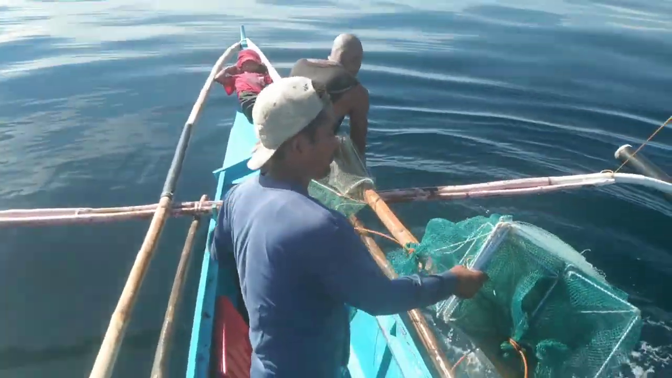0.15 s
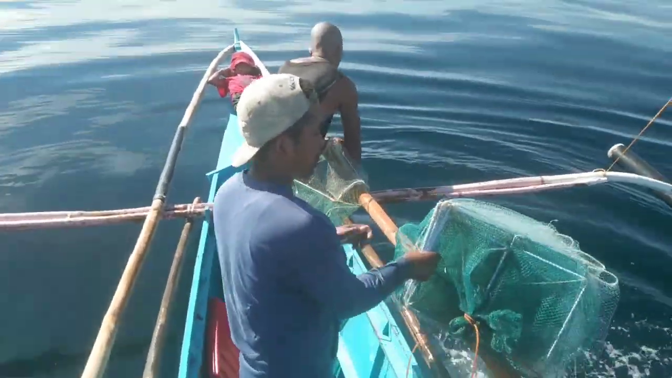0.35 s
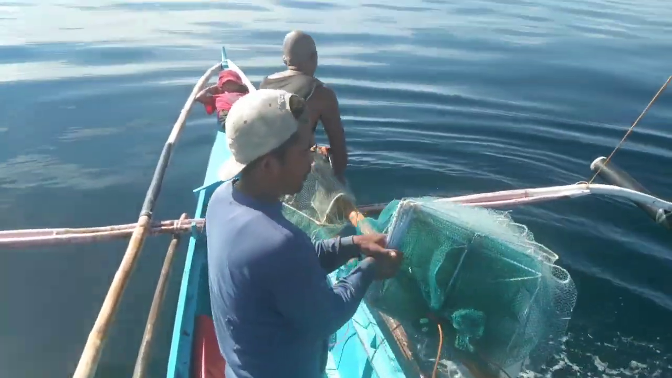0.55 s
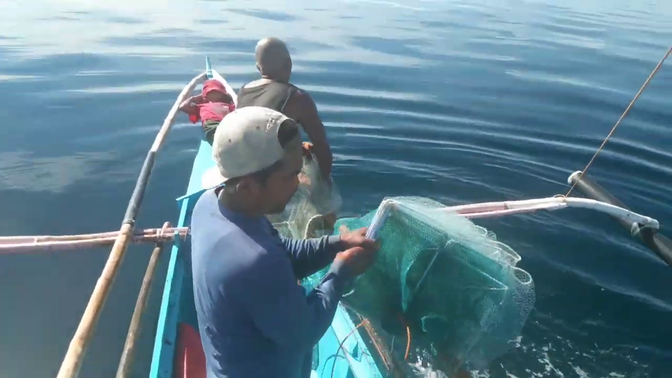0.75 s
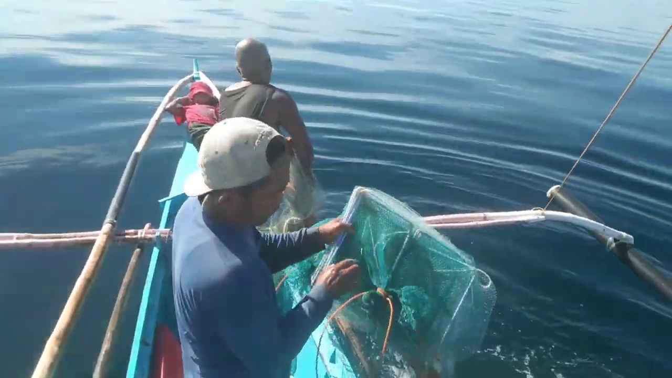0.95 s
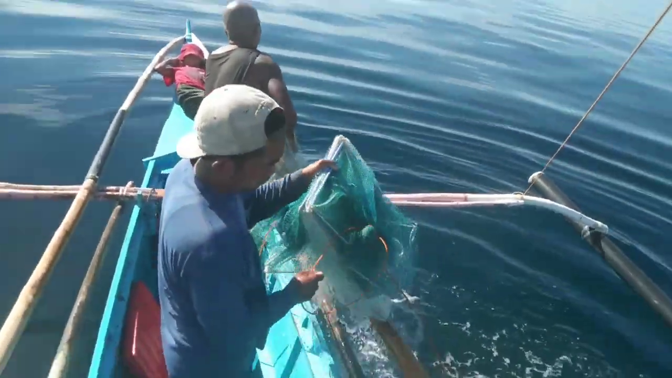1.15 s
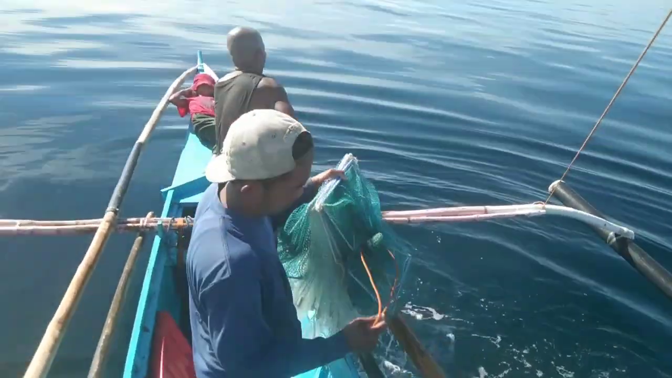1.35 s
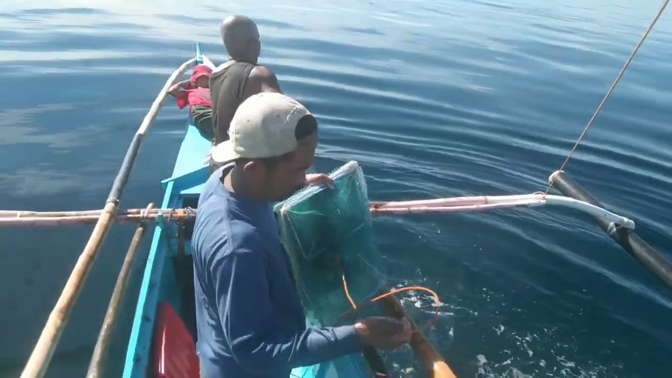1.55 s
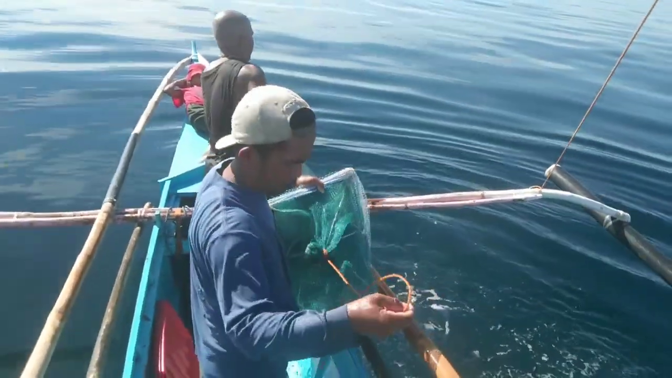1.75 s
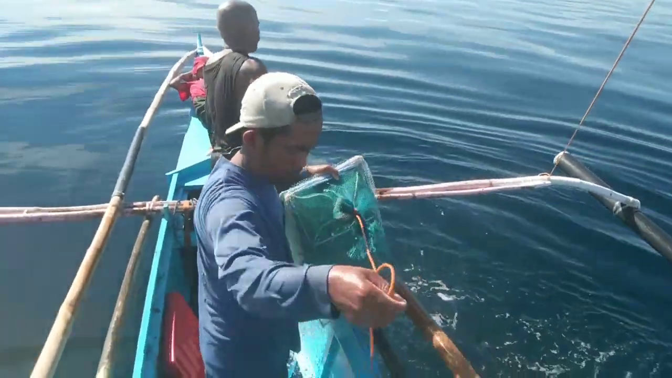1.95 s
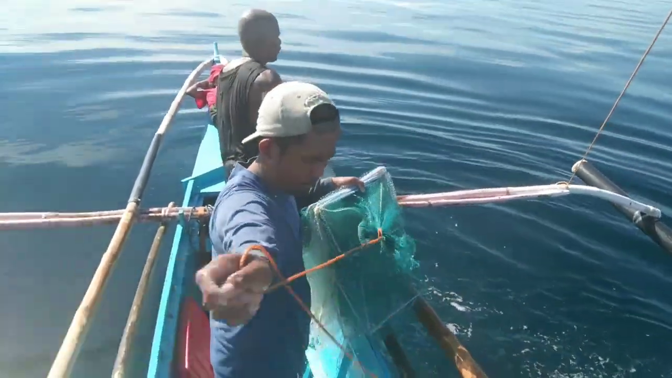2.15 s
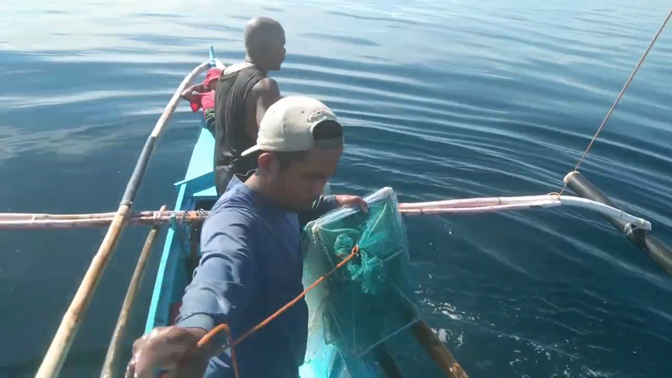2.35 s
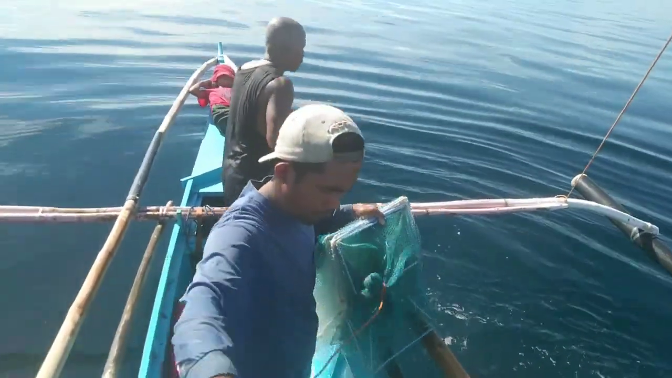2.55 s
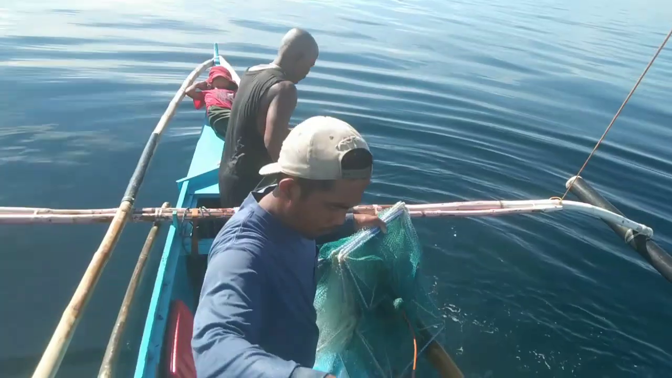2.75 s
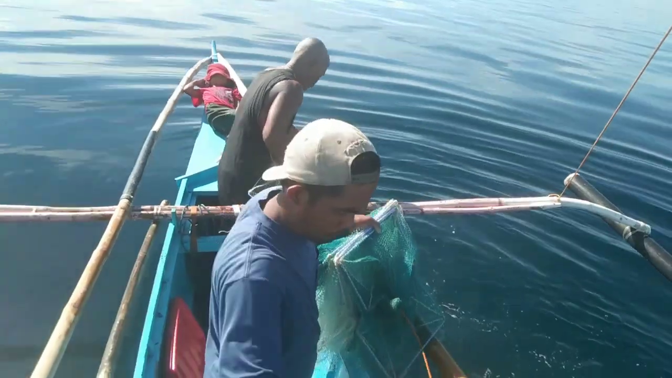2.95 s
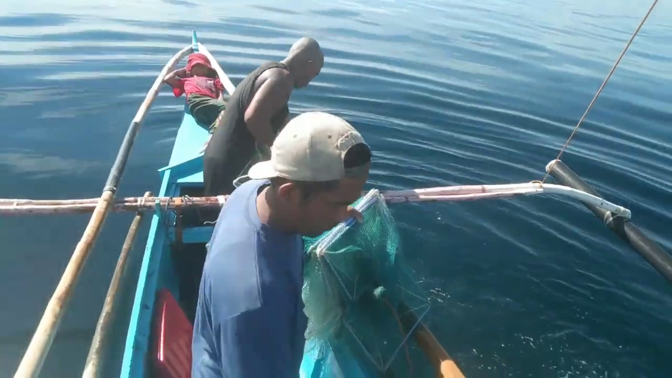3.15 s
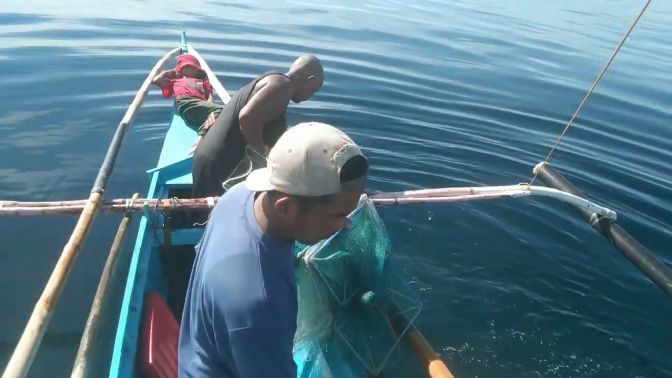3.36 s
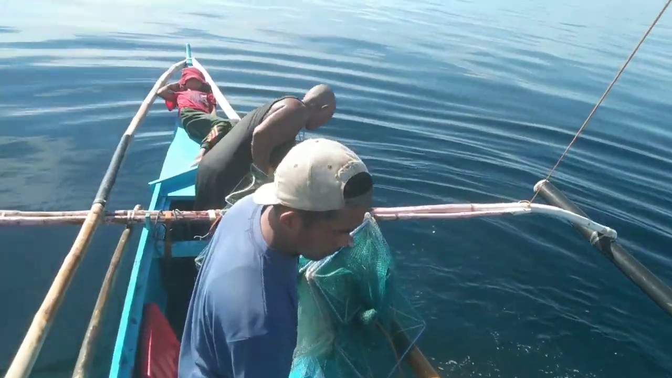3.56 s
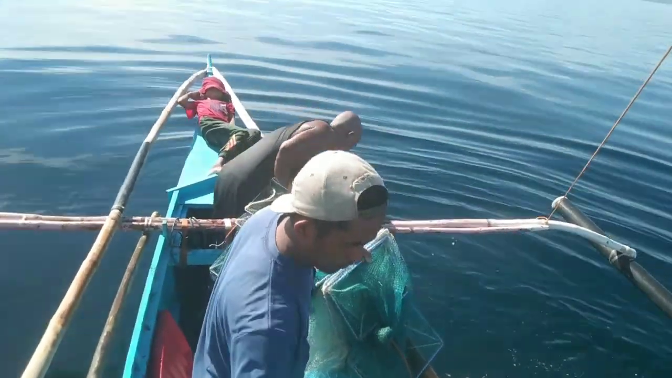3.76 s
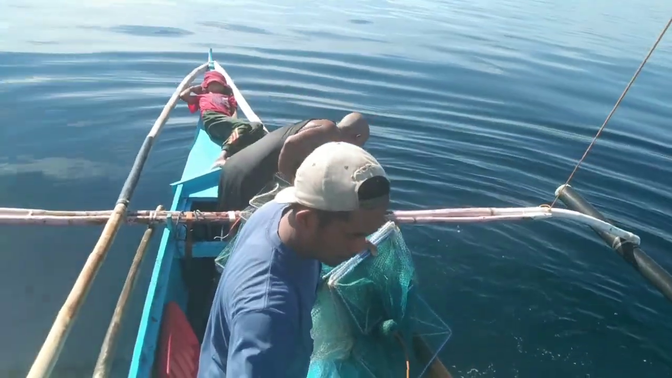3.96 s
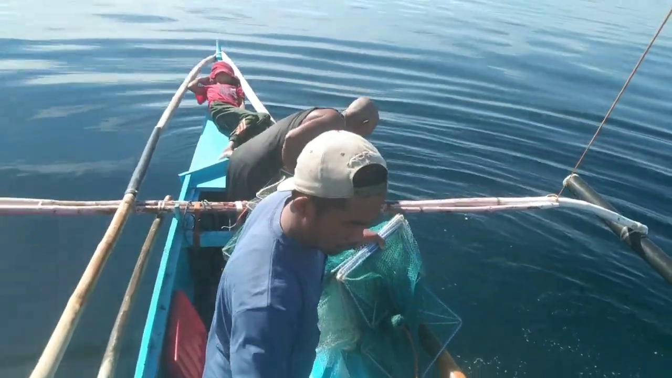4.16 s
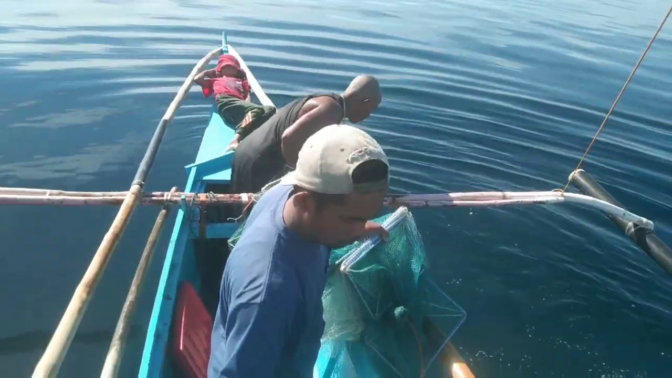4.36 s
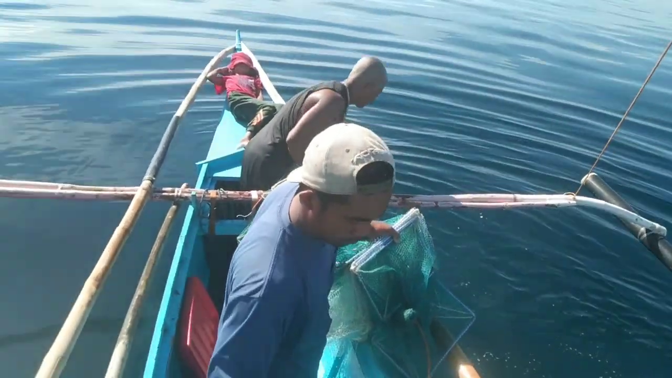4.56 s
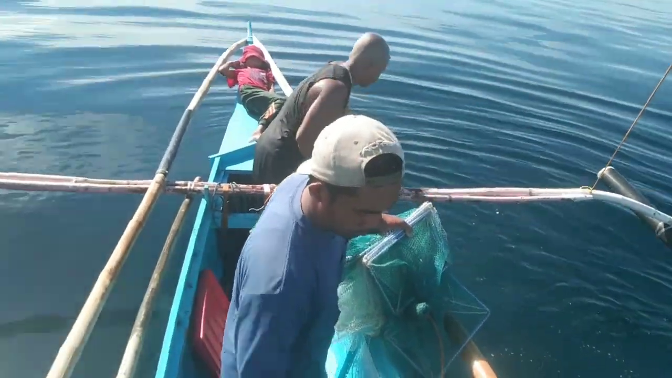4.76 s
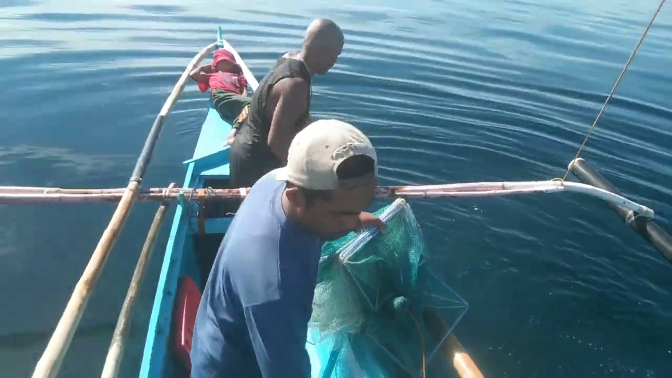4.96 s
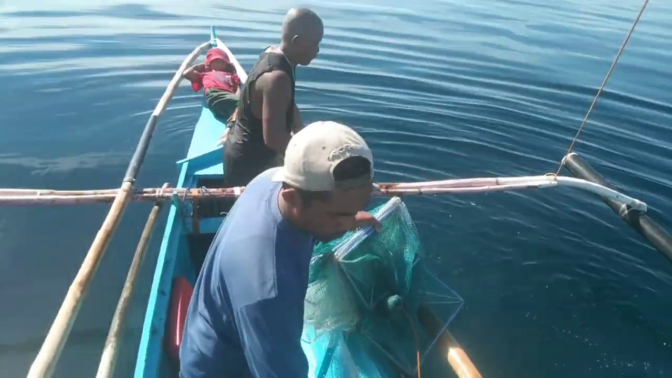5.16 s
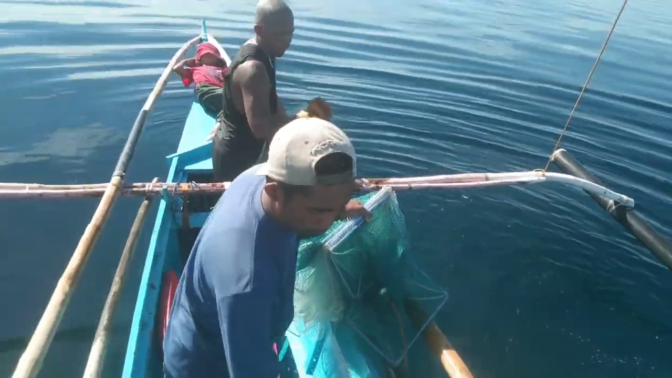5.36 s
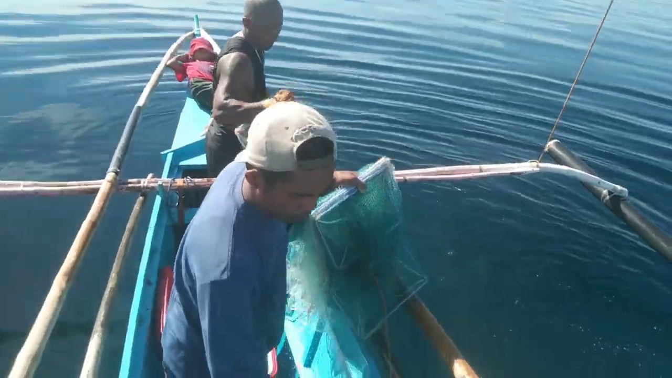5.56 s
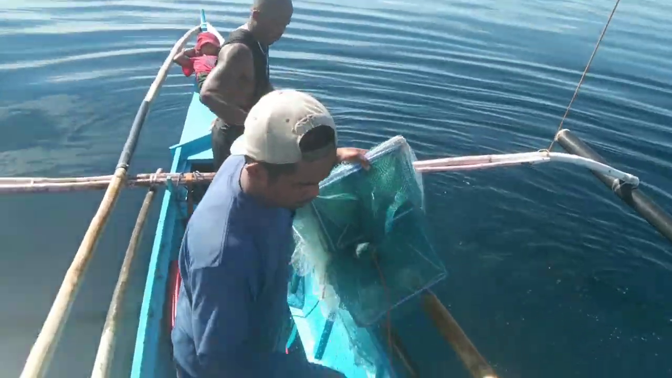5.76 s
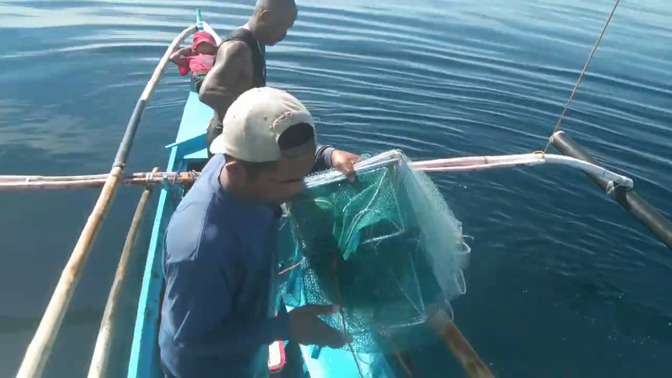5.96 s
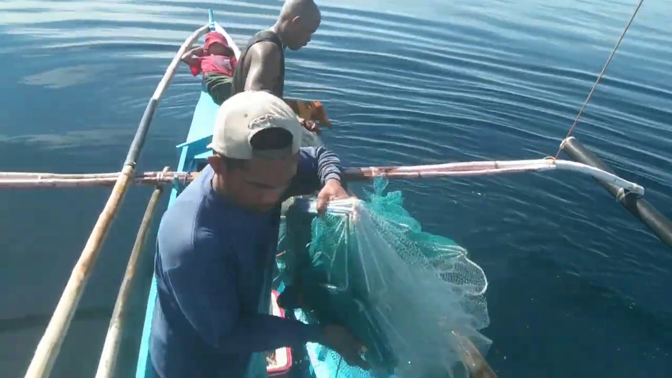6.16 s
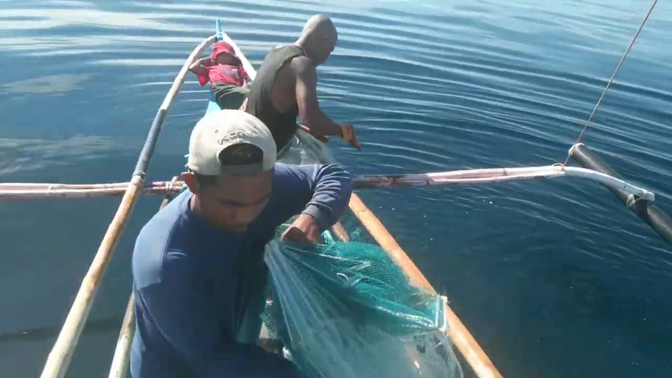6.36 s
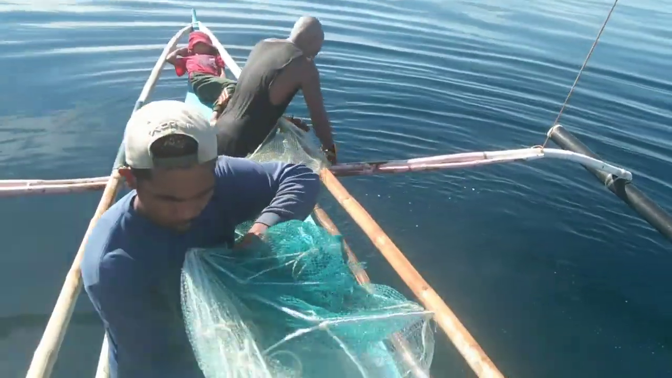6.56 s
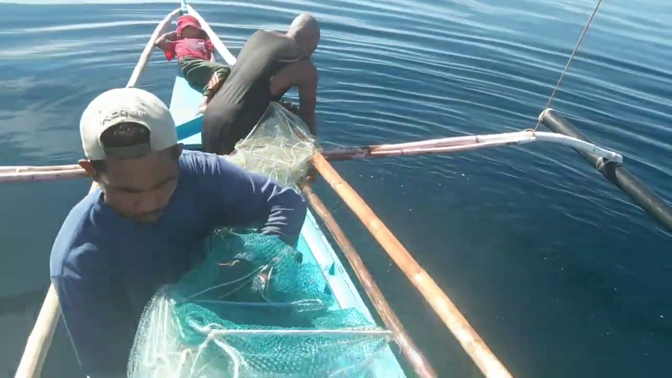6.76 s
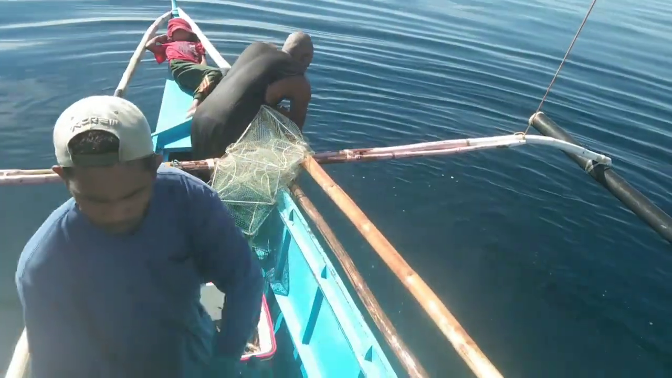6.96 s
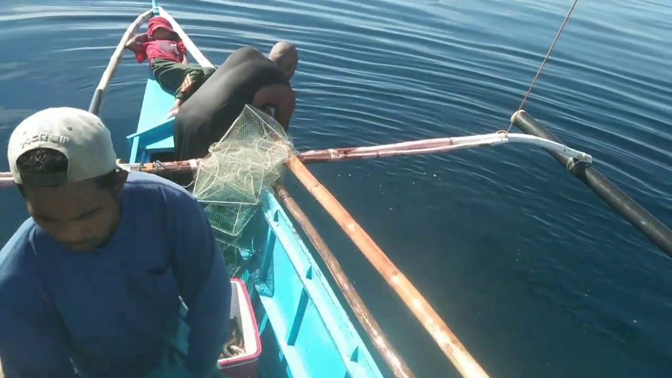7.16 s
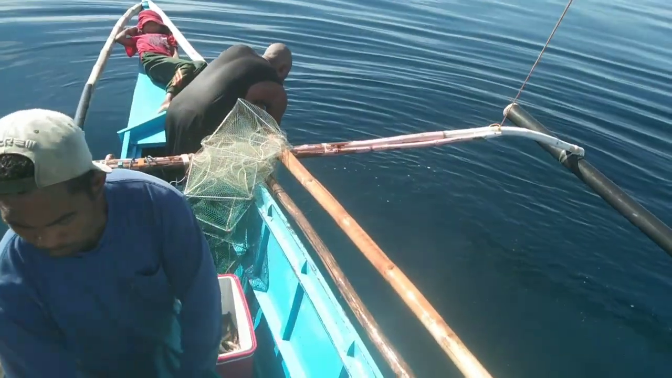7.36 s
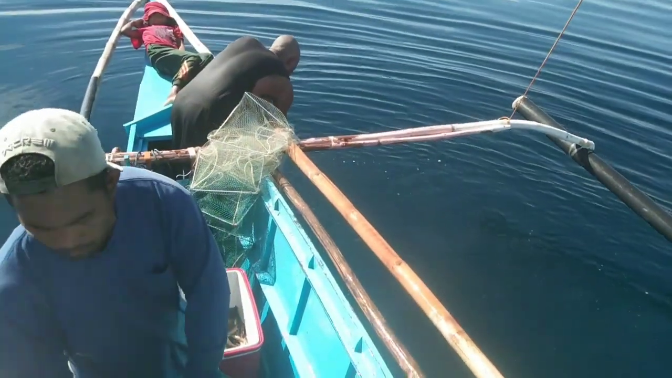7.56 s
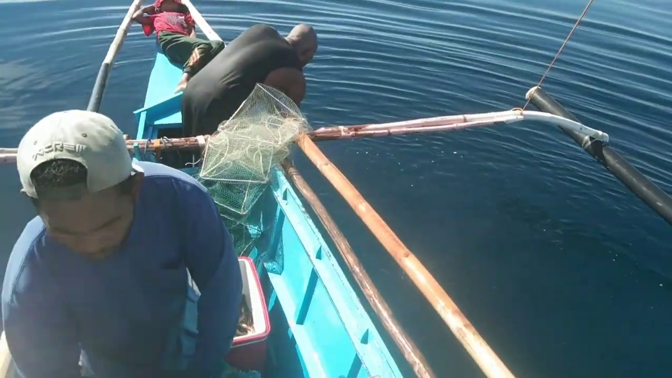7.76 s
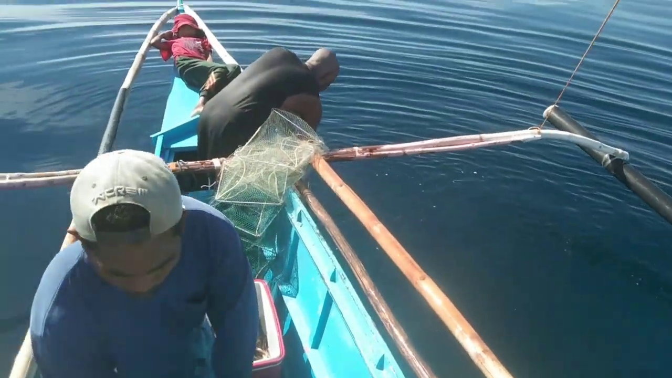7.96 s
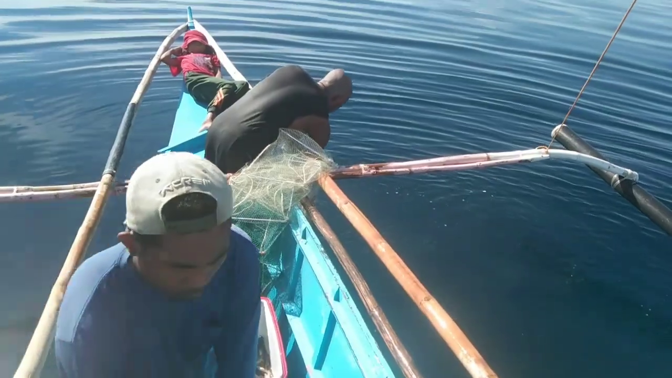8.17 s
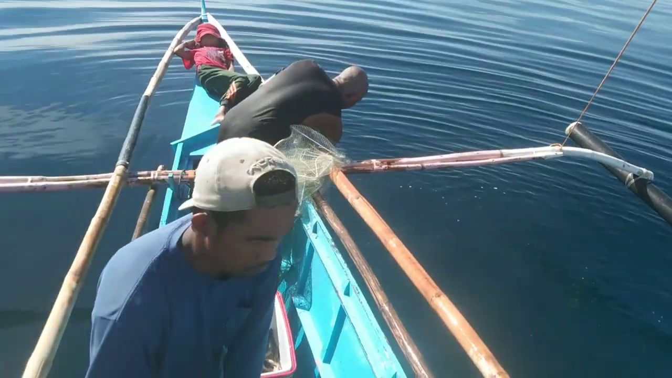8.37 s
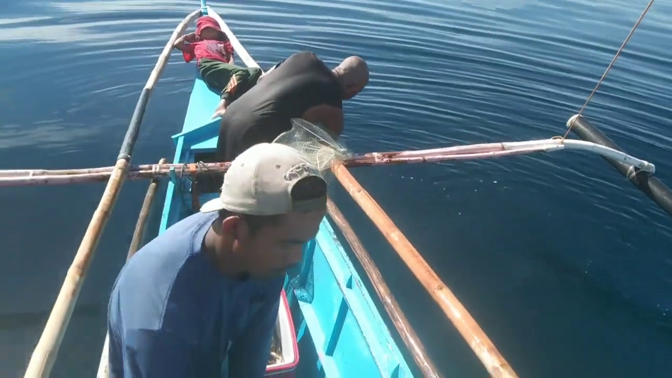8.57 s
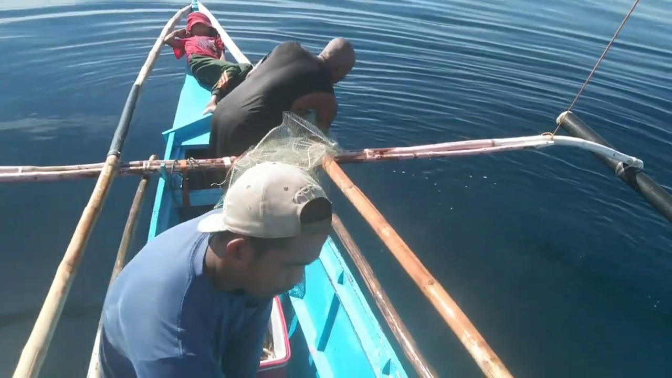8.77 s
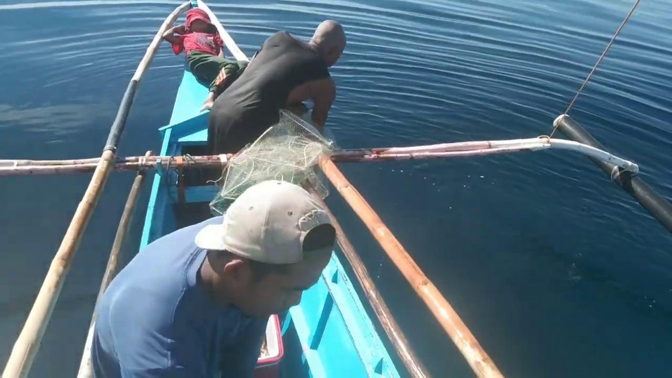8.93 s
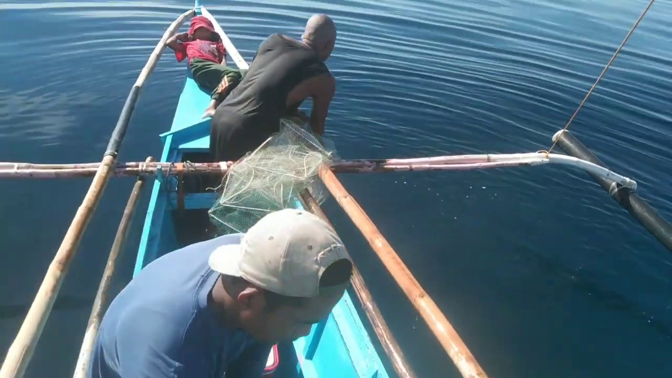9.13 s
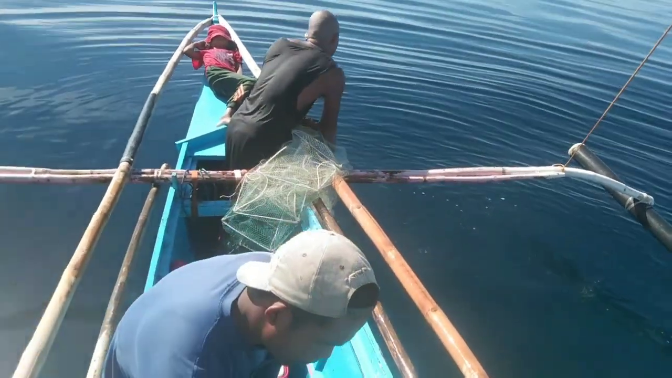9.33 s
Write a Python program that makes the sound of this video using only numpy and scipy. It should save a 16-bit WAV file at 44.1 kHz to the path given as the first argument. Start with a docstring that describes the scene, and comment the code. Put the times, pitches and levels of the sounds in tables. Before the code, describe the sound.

A bright rush of water streams from wet netting beside a small wooden boat, draining to patter, plinking drips and occasional hull bumps.

```python
"""Hauling net fish traps

Net fish traps are hauled into a small outrigger boat on a calm sea, heard from a metre or two away.
Water pours off the mesh as bursts of noise and swarms of bubbles, then thins to a patter and single drips.
Big drops and drips mix noise with a ringing tone; wet netting rustles as filtered, tiny catches.
The trap's frame bumps the wooden hull, which rings at its own pitches; its taps are short noise cracks."""
import sys
import numpy as np
from scipy import signal
from scipy.fft import rfft, irfft
from scipy.io import wavfile
from scipy.ndimage import uniform_filter1d

SR = 44100
rng = np.random.default_rng(int(sys.argv[2]) if len(sys.argv) > 2 else 0)


def transcribe(signal):
    """Save signal, clipped to [-1, 1], as a 16-bit WAV file at the path in sys.argv[1]."""
    frames = np.atleast_2d(signal).T
    limited = np.clip(frames, -1, 1)
    pcm = np.round(limited * 32767).astype(np.int16)
    wavfile.write(sys.argv[1], SR, pcm)


N = 414540
TIME = np.arange(N) / SR

# Levels below are those of each sound before the echo, the treble cuts and the noise suppressor.
# the biggest drops smacking the water and the boat: (time [s], peak level [dB], pitch [Hz])
BIG_DROPS = [(0.429, -33, 4140), (1.0308, -21.5, 3730), (1.687, -21, 4640), (1.899, -26, 4970),
             (1.993, -24.5, 3000), (2.1799, -21.5, 4520), (2.203, -31.5, 2060), (2.352, -21.5, 5400),
             (2.4171, -27.5, 3600), (2.4515, -26, 4000), (2.519, -35, 5050), (2.559, -28.5, 4360),
             (2.653, -31.5, 3430), (2.7855, -26.5, 3510), (2.8614, -34.5, 4180), (2.881, -33.5, 3540),
             (2.9778, -34.5, 5450), (3.003, -34, 3920), (3.236, -24, 2920), (3.2786, -28, 4150),
             (3.439, -32.5, 3300), (3.7583, -37, 4340), (3.7803, -28, 2510), (3.8325, -31, 3600),
             (4.1028, -37.5, 4990), (4.35, -42.5, 4200), (4.4893, -41.5, 4370), (4.547, -41.5, 4360),
             (4.6007, -41.5, 4780), (4.703, -48, 4670), (4.817, -47.5, 4200), (4.847, -47, 3860),
             (5.335, -42.5, 4400), (5.4734, -32.5, 4110), (5.94, -30.5, 4720), (6.156, -40, 4240),
             (6.4354, -35.5, 4260), (6.662, -34.5, 4780), (6.723, -39, 3915), (7.089, -34.5, 4460),
             (7.3635, -32, 4150), (7.485, -35.5, 3890), (7.5449, -46.5, 2190), (7.7497, -49.5, 2030),
             (7.828, -44, 5040), (7.862, -50.5, 2300), (7.9866, -33, 4360), (8.656, -42, 4450)]
# the clearest air bubbles trapped by drips:
# (time [s], peak level [dB], starting pitch [Hz], pitch climb [octaves/s])
DRIP_BUBBLES = [(2.135, -45.5, 943, 12), (2.325, -39.5, 1280, 8.5), (2.949, -48, 1713, 5),
                (3.121, -50.5, 907, 23), (3.15, -48, 679, 0), (3.419, -41.5, 920, 18),
                (3.536, -43, 1213, 12), (3.646, -41, 1311, 5), (4.004, -48.5, 1550, 24),
                (4.045, -44, 1078, 30), (4.133, -49.5, 1303, 12), (4.291, -44.5, 2350, 6.5),
                (4.309, -46.5, 1236, 18.5), (4.535, -52, 873, 1.5), (4.659, -48, 2440, 5.5),
                (4.776, -51, 2325, 11), (4.902, -50, 1410, 21), (5.149, -50, 1424, 28),
                (5.313, -44.5, 1727, 27), (6.237, -45, 1803, 9.5), (6.287, -47.5, 1047, 9),
                (6.54, -45.5, 1942, 11.5), (6.666, -42, 1970, 11), (6.72, -53.5, 1120, 11.5),
                (6.747, -48, 1257, 23.5), (6.804, -54.5, 1467, 11), (6.857, -54.5, 1854, 11),
                (6.992, -46.5, 3066, 6.5), (7.345, -50.5, 902, 34.5), (7.403, -48, 1418, 3),
                (7.437, -48, 2300, 2), (7.45, -51, 1258, 33), (7.592, -53.5, 1394, 16),
                (7.734, -47.5, 2596, 9.5), (8.077, -49.5, 993, 21), (8.763, -52, 1854, 9),
                (8.959, -51.5, 1860, 10), (9.07, -57, 980, 17.5), (9.234, -47.5, 1860, 11),
                (9.392, -42, 2906, 11)]
# water sloshing in the mesh and along the hull:
# (start [s], length [s], level [dB], pitch at start [Hz], pitch at end [Hz])
SLOSH_EVENTS = [(0.338, 0.13, -48.5, 1940, 2030), (0.721, 0.13, -54.5, 875, 390),
                (1.649, 0.22, -55.5, 327, 283), (2.422, 0.053, -58.5, 377, 660),
                (5.172, 0.2, -62.5, 1950, 2230), (5.455, 0.13, -62, 440, 221),
                (5.748, 0.13, -58, 850, 258.5), (7.141, 0.12, -59.5, 1300, 650),
                (8.215, 0.1, -58.5, 1300, 910)]
# dribbles shaken from the traps as they are handled: (start [s], length [s], level [dB])
DRIBBLES = [(1.88, 0.1, -46.5), (3.624, 0.22, -57), (3.926, 0.82, -69.5), (4.356, 0.11, -63.5),
            (5.016, 0.093, -62.5), (5.515, 0.77, -62.5), (6.368, 0.49, -60.5), (7.494, 0.06, -64),
            (7.794, 0.07, -63), (8.43, 0.05, -70.5), (8.625, 0.046, -64)]
# wet netting dragged and squeezed: (start [s], length [s], level [dB], crisp treble against it [dB])
RUSTLES = [(5.536, 0.51, -54.5, -20.5), (6.714, 0.018, -70.5, 11.5), (7.092, 0.16, -51, -8),
           (7.987, 0.0092, -45.5, -10.5), (8.234, 0.07, -55.5, -14.5), (9.203, 0.034, -62.5, -11.5)]
# pitches at which strands rasp as they catch: (pitch [Hz], level against the rub [dB])
STRANDS = [(1350, -13), (2400, -14.5), (4200, -21)]
# blows on the hull; a harder contact lets more treble through:
# (time [s], peak level [dB], hardness as a treble cut-off [Hz], fade time of the scuff [s])
HULL_BLOWS = [(0.0, -46.5, 141.6, 0.079), (0.292, -19.5, 1020, 0.0096), (0.334, -37.5, 350, 0.018),
              (0.729, -41, 805, 0.055), (4.975, -32.5, 1100, 0.0195), (5.498, -48.5, 191, 0.11),
              (5.614, -44.5, 360, 0.023), (7.172, -40, 550, 0.03), (7.207, -37.5, 450, 0.019),
              (7.995, -33, 610, 0.012), (8.047, -47, 113, 0.05), (8.225, -45, 500, 0.045),
              (8.288, -43.5, 260, 0.015), (8.449, -54, 644, 0.027), (9.214, -59.5, 400, 0.035)]
# ringing pitches of the hull, before each blow varies them:
# (pitch [Hz], strength [dB], time to fade by 60 dB [s])
HULL_MODES = [(91, -21, 0.33), (127, -14.5, 0.25), (163.5, -6, 0.16), (217, -3, 0.046), (291, 2, 0.092),
              (362, -3, 0.091), (526, -3.5, 0.08), (605, -3, 0.078), (736.5, -5.5, 0.087),
              (976.5, -5, 0.07), (1210, 1, 0.047), (1937, -2, 0.042)]
# sharp taps of the trap's frame on the wood: (time [s], peak level [dB], pitch [Hz])
FRAME_TAPS = [(0.2935, -21, 1920), (3.557, -31.5, 2350), (3.964, -42, 880), (4.975, -28.5, 840),
              (5.034, -39.5, 2210), (5.597, -34, 1250), (5.799, -34, 1470), (6.081, -29, 1430),
              (6.493, -44, 1280)]
# tone colour of the bright spray: (frequency [Hz], relative level [dB])
SPRAY_COLOUR = [(400, -35), (900, -6.5), (1500, -16.5), (2400, -6), (3300, -4.5), (4300, 2), (5700, -4),
                (6500, -10), (8500, -14.5), (11000, -19), (15500, -35.5)]
# tone colour of the low splash: (frequency [Hz], relative level [dB])
SPLASH_COLOUR = [(60, -29), (250, -8.5), (450, -1.5), (700, -4.5), (1700, 3), (2600, -25.5), (5000, -47.5)]
# tone colour of the rubbing mesh: (frequency [Hz], relative level [dB])
MESH_COLOUR = [(150, -11.5), (600, -2.5), (1400, -0.5), (2600, 1.5), (4500, 8), (6000, -2.5), (8000, -15),
               (12000, -47)]
# tone colour of the crisp treble of the mesh: (frequency [Hz], relative level [dB])
CRISP_COLOUR = [(4000, -21), (7000, 16.5), (9500, 12), (12000, 2), (15000, -16)]
# tone colour of the sea's wash: (frequency [Hz], relative level [dB])
SEA_COLOUR = [(25, -7.5), (90, 7), (400, -3.5), (900, -25), (4400, -9.5), (7000, -18), (15000, -28.5)]

# the runoff grows while the trap is lifted, is fullest as it clears the sea, then drains away
CLEAR_S, SPRAY_DB, LIFT_DB_PER_S, DRAIN_DB_PER_S = .75, -40, 2.5, 5
# the low splash under the stream, and the dB it loses for each dB of flow
SPLASH_DB, SPLASH_SLOPE = -54, 0.88
# drops in the fullest stream, and the fall in flow that halves their number
FULL_DROPS_PER_S, HALVING_DB = 2900, 4.5
# swung inboard, the trap loses part of its stream, and later runs empty
INBOARD_S, SWING_S, INBOARD_LOSS_DB, EMPTY_S = 2.35, 0.22, 4.5, 4.126
# boost of the fine spray above 6 kHz: always some, more while the stream crosses the boat's edge
FINE_DB, GUNWALE_DB, GUNWALE_S, CROSSING_S = 2.5, 10.5, 2.52, 0.77
# the hardest blow shakes a slop of water out of the mesh; until then some flow is held back
SLOP_S, SLOP_LENGTH_S, SLOP_DB, HELD_DB = .36, 0.079, 4, 3.5
# how fast a dribble or a pull on the net swells and fades; level of the constant seep
DRIBBLE_ATTACK_S, DRIBBLE_RELEASE_S, SEEP_DB = 0.018, 0.026, -71.5
PULL_ATTACK_S, PULL_RELEASE_S = 0.018, 0.037
# bubbles in a slosh, the spread of their sizes, and the cycles each one rings
SLOSH_BUBBLES_PER_S, SLOSH_SPREAD_OCTAVES, SLOSH_CYCLES = 330, .38, 17
# the frame rattles as it scuffs: spread of its little catches
RATTLE_DB = 6
SEA_DB = -76
# the recorder's noise suppressor: how far above the quietest level it opens, and its deepest cut
SUPPRESS_ABOVE_DB, SUPPRESS_DEPTH_DB = 6, -6.5
TOP_HZ = 15600


def runoff():
    """Drops smack the sea and leave bubbles; as the flow thins, fewer of them overlap."""
    flow = flow_db()
    rate = FULL_DROPS_PER_S * 2 ** (np.maximum(flow, -20) / HALVING_DB)
    hits = steady(smacks(rate, spread_db=6.5), 0.23)
    small_bubbles = steady(fizz(1.6 * rate, low_hz=1700, high_hz=11000, cycles=30, spread_db=3.5), .14)
    spray = colour(hits + small_bubbles, SPRAY_COLOUR)
    fine_db = FINE_DB + GUNWALE_DB * np.exp(-((TIME - GUNWALE_S) / CROSSING_S) ** 2)
    treble = signal.butter(2, 6000, "high", fs=SR, output="sos")
    spray += (undb(fine_db) - 1) * signal.sosfiltfilt(treble, spray)
    # the stream wanders over the water, and its colour shifts with it
    shifts = [band(spray, hz, 2.5) * (surge(rate=9, depth_db=2.5) - 1) for hz in (2000, 3100, 4600)]
    spray = spray + sum(shifts)
    large_bubbles = steady(fizz(rate / 10, low_hz=400, high_hz=2200, cycles=26, spread_db=4), .2)
    splash = colour(large_bubbles + undb(11.5) * hits, SPLASH_COLOUR)
    slop = SLOP_DB * swell(SLOP_S, SLOP_LENGTH_S, attack=.02, release=0.52)
    spray = unit(spray) * undb(SPRAY_DB + flow)
    splash = unit(splash) * undb(SPLASH_DB + SPLASH_SLOPE * flow + slop)
    draining = np.clip((EMPTY_S - TIME) / 0.18 + .5, 0, 1)
    gush = surge(rate=22, depth_db=0.63 - 0.051 * flow)  # the thinner the stream, the more it sputters
    return draining * gush * (spray + splash)


def flow_db():
    """Flow off the trap relative to its fullest: lifted, shaken free, draining, swung inboard."""
    lifting, draining = np.maximum(CLEAR_S - TIME, 0), np.maximum(TIME - CLEAR_S, 0)
    inboard = np.clip((TIME - INBOARD_S) / SWING_S + .5, 0, 1)
    held = np.clip((SLOP_S - TIME) / .04, 0, 1)
    rise = -LIFT_DB_PER_S * lifting - HELD_DB * held
    return rise - DRAIN_DB_PER_S * draining - INBOARD_LOSS_DB * inboard


def smacks(rate, spread_db, burst_s=0.002):
    """Drops hitting water: each is a noise burst of a few milliseconds; in a full stream they merge."""
    hit_energy = clicks(rate, spread_db) ** 2
    energy = signal.lfilter([1], [1, -np.exp(-1 / (burst_s * SR))], hit_energy)
    return np.sqrt(energy) * rng.standard_normal(N)


def fizz(rate, low_hz, high_hz, cycles, spread_db):
    """A swarm of bubbles of random sizes, each ringing for a set number of cycles, more or less."""
    out, sizes = np.zeros(N), clicks(rate, spread_db)
    starts = np.flatnonzero(sizes)
    draws = rng.random((len(starts), 3))
    for i, (pitch_draw, ring_draw, rise_draw) in zip(starts, draws):
        hz = low_hz * (high_hz / low_hz) ** pitch_draw
        t60 = cycles * (.5 + ring_draw) / hz
        rise = rise_draw ** 4 / t60 / 2  # most bubbles barely climb
        add(out, i / SR, sizes[i] * bubble(hz, rise, t60, 2 / hz))
    return out


def bubble(hz, rise, t60, attack):
    """A ringing bubble; its pitch climbs, by an octave at most, as it nears the surface."""
    t = seconds(t60)
    pitch = hz * 2 ** np.minimum(rise * t, 1)
    tone = np.sin(2 * np.pi * np.cumsum(pitch) / SR)
    return tone * (1 - np.exp(-t / attack)) * np.exp(-np.log(1000) * t / t60)


def drops(splat_s=0.0046, spatter_db=-19, splat_db=-2):
    """Each big drop: a brief ping, a noisy splat and a spatter of droplets that dies away more slowly."""
    out, t = np.zeros(N), seconds(.08)
    fade = np.exp(-t / splat_s) + undb(spatter_db) * np.exp(-t / .007)
    shape = (1 - np.exp(-t / .0005)) ** 2 * fade
    for s, db, hz in BIG_DROPS:
        splat = band(band(shape * rng.standard_normal(len(t)), hz, 2.53), hz, 0.9)
        sound = peak(splat, splat_db)
        ping = bubble(hz, 25, 26 / hz, .0008)[:len(t)]
        sound[:len(ping)] += peak(band(ping, hz, 1.0), 0)
        add(out, s, peak(sound, db))
    return out


def drips(tick_db=-14):
    """A faint tick as the drip lands, with the plink of its bubble; low and fast-climbing ones ring longer."""
    out, t = np.zeros(N), seconds(0.035)
    for s, db, hz, rise in DRIP_BUBBLES:
        plink = bubble(hz, rise, (66 + 1.5 * rise) / hz, attack=0.002)
        # the bubble's loudness wobbles in the churned water
        wobble = unit(uniform_filter1d(rng.standard_normal(len(plink)), size=110))
        add(out, s, peak(plink * (1 + .5 * wobble), db))
        tick = band(band(rng.standard_normal(len(t)), 3000, 2.1), 3100, 1.0) * np.exp(-t / 0.011)
        add(out, s, peak(tick, db + tick_db))
    return out


def trickle():
    """Scattered clusters of droplets: a tiny tick or a short ping each."""
    pings = steady(fizz(300, low_hz=1100, high_hz=11000, cycles=70, spread_db=3.5), .1)
    ticks = 1.3 * band(steady(smacks(100, spread_db=4), .1), 3500, .6)
    clusters = surge(rate=28, depth_db=3.5)
    droplets = unit(colour(pings + ticks, SPRAY_COLOUR) * clusters)
    shaken = sum(undb(db) * swell(s, length, DRIBBLE_ATTACK_S, DRIBBLE_RELEASE_S)
                 for s, length, db in DRIBBLES)
    return droplets * (undb(SEEP_DB) + shaken)


def deck_patter():
    """Held over the boat, the trap dribbles on a plank that drums softly."""
    plank = band(band(clicks(65, spread_db=1), 400, 3.7), 400, 3.7)
    return unit(plank) * undb(-75) * swell(start=2.2, length=1.7, attack=0.24, release=0.17)


def sloshes():
    """Each slosh is a cloud of bubbles that swells and fades; its pitch shifts with their size."""
    out = np.zeros(N)
    for s, length, db, start_hz, end_hz in SLOSH_EVENTS:
        cloud, total = np.zeros(N), int(SLOSH_BUBBLES_PER_S * length) + 2
        for k, (when, size) in enumerate(rng.standard_normal((total, 2))):
            along = np.clip((k + .5 + when / 2) / total, 0, 1)  # 0 at the start of the slosh, 1 at its end
            hz = start_hz * (end_hz / start_hz) ** along * 2 ** (SLOSH_SPREAD_OCTAVES * size)
            ring = bubble(hz, 6.4, SLOSH_CYCLES / hz, 1 / hz)
            add(cloud, s + along * length, np.sin(np.pi * along) * ring)
        out += cloud * undb(db) * np.sqrt(length * SR / np.sum(cloud ** 2))
    return out


def netting():
    """Wet strands slip over each other in tiny catches; each pull swells and dies away."""
    rub = unit(steady(smacks(1100, spread_db=4), .04))
    rub = unit(rub * surge(rate=45, depth_db=2.2) * surge(rate=11, depth_db=1.5))
    rasp = np.zeros(N)
    for hz, db in STRANDS:
        strand = band(band(rub, hz, 6), hz, 1)
        rasp += undb(db) * unit(strand * surge(rate=35, depth_db=5))
    body, crisp = unit(colour(rub, MESH_COLOUR) + rasp), colour(rub, CRISP_COLOUR)
    out = np.zeros(N)
    for s, length, db, crisp_db in RUSTLES:
        pull = swell(s, length, PULL_ATTACK_S, PULL_RELEASE_S)
        out += undb(db) * pull * (body + undb(crisp_db) * crisp)
    return out


def knocks(clatter_db=-10):
    """A blow and the scuff after it ring the hull; every spot weights the ringing pitches differently."""
    out, t = np.zeros(N), seconds(.35)
    hz, mode_db, t60 = np.transpose(HULL_MODES)[:, :, None]
    polarity = (-1) ** np.arange(len(HULL_MODES))[:, None]
    for s, db, hard_hz, scuff_s in HULL_BLOWS:
        weight, detune = rng.standard_normal((len(HULL_MODES), 2)).T[:, :, None]
        modes = polarity * undb(mode_db + weight) * np.sin(2 * np.pi * hz * (1 + .02 * detune) * t)
        ring = np.sum(modes * np.exp(-np.log(1000) * t / t60), axis=0)
        # loose gear clatters along with the planks
        clatter = unit(band(rng.standard_normal(len(t)), 550, .6)) * np.exp(-t / 0.045)
        ring += undb(clatter_db) * clatter
        push = undb(-24) * rng.standard_normal(len(t)) * np.exp(-t / scuff_s)
        catches = np.repeat(rng.standard_normal(len(t)), int(.007 * SR))[:len(t)]  # a new one every 7 ms
        push *= undb(RATTLE_DB * catches)
        push[0] += 1  # the blow itself
        contact = signal.butter(2, [65, max(hard_hz, 90)], "band", fs=SR, output="sos")
        push = signal.sosfilt(contact, push)
        add(out, s, peak(signal.fftconvolve(ring, push)[:len(t)], db))
    return out


def taps(crack_s=0.002, ring_s=0.0094, ring_db=-11):
    """The frame hits wood with a dry crack, and the stick rings briefly."""
    out, t = np.zeros(N), seconds(.1)
    for s, db, hz in FRAME_TAPS:
        crack, ring = rng.standard_normal((2, len(t)))
        crack = unit(band(band(crack, hz, 0.51), hz, 1.0)) * np.exp(-t / crack_s)
        ring = unit(band(band(ring, hz, 0.81), hz, 0.93)) * np.exp(-t / ring_s)
        add(out, s, peak(crack + undb(ring_db) * ring, db))
    return out


def sea():
    """The faint wash of the calm sea: steady noise given the sea's tone colour."""
    return undb(SEA_DB) * colour(rng.standard_normal(N), SEA_COLOUR)


def boat_echo(x, near_db, tail_db, near_s=0.0073, tail_s=0.088, count=6):
    """Planks, booms and the water scatter a short echo; it changes as the water falls in different spots."""
    t, out = seconds(.3), np.zeros(N)
    shares = np.array([wander(rate=9) for _ in range(count)])
    for share in shares / np.linalg.norm(shares, axis=0):
        # fading noise after a gap of 1 ms
        near = rng.standard_normal(len(t)) * np.exp(-t / near_s) * (t > .001)
        tail = rng.standard_normal(len(t)) * np.exp(-t / tail_s) * (t > .001)
        response = undb(near_db) * near / np.linalg.norm(near) + undb(tail_db) * tail / np.linalg.norm(tail)
        out += signal.oaconvolve(x * share, response)[:N]
    return x + out


def suppress(x, size=1024):
    """Noise suppressor: each narrow band is turned down while it stays near its own quietest level."""
    spectrum = signal.stft(x, nperseg=size, noverlap=size * 3 // 4)[2]
    power = uniform_filter1d(np.abs(spectrum) ** 2, size=3, axis=-2)
    power = np.maximum(signal.lfilter([.5], [1, -.5], power), 0)  # it reacts with a short lag
    noise = uniform_filter1d(np.percentile(power, 15, axis=-1, keepdims=True), size=15, axis=-2)
    above = (power / (np.abs(noise) * undb(SUPPRESS_ABOVE_DB) ** 2 + 1e-30)) ** 2
    gain = (above + undb(SUPPRESS_DEPTH_DB)) / (above + 1)
    return signal.istft(spectrum * gain, nperseg=size, noverlap=size * 3 // 4)[1][..., :N]


def clicks(rate, spread_db):
    """Random impacts: many small, a few large."""
    hit = rng.random(N) < rate / SR
    size_db = spread_db * np.minimum(rng.exponential(size=N), 4)
    return hit * rng.choice([-1, 1], N) * undb(size_db)


def steady(x, window):
    """Even out the slow level of a stream of grains and keep its fine grain."""
    width = int(window * SR)
    power = np.maximum(uniform_filter1d(uniform_filter1d(x ** 2, width), width), 0)
    return x / np.sqrt(power + np.mean(x ** 2) / 1000)


def surge(rate, depth_db):
    """Uneven gushes or catches: a gain that wanders at random."""
    return undb(depth_db * wander(rate))


def wander(rate):
    """A value that drifts at random around zero, heading for a new target rate times a second."""
    knots = np.arange(0, TIME[-1] + 1, 1 / rate)
    return np.interp(TIME, knots, rng.standard_normal(len(knots)))


def swell(start, length, attack, release):
    """Envelope that builds up to its start, holds, and dies away."""
    before, after = (start - TIME) / attack, (TIME - start - length) / release
    return np.exp(-np.maximum(np.maximum(before, after), 0))


def colour(x, points):
    """Filter with the given (frequency [Hz], level [dB]) shape, no pre-echo and unit power gain."""
    size = 4096
    hz, db = np.transpose(points)
    grid_hz = np.arange(size // 2 + 1) * SR / size
    log_gain = np.log(undb(np.interp(np.log(grid_hz + 1), np.log(hz), db)))
    # folding the cepstrum makes the response start at once (minimum phase)
    cepstrum = irfft(log_gain)
    cepstrum[1:size // 2] *= 2
    cepstrum[size // 2 + 1:] = 0
    response = irfft(np.exp(rfft(cepstrum)))
    return signal.oaconvolve(x, response / np.linalg.norm(response))[:len(x)]


def band(x, hz, q):
    """One resonance; a higher q is narrower and rings longer."""
    return signal.lfilter(*signal.iirpeak(min(hz, SR * .45), q, fs=SR), x)


def seconds(length):
    """Time axis of a short sound."""
    return np.arange(int(length * SR) + 2) / SR


def undb(db):
    """Decibels to gain."""
    return 10 ** (np.asarray(db) / 20)


def unit(x):
    """Scale to an average (rms) level of 1."""
    return x / np.sqrt(np.mean(x ** 2) + 1e-20)


def peak(x, db):
    """Scale to a peak level."""
    return x * undb(db) / np.abs(x).max()


def add(out, s, x):
    """Mix x into out from time s."""
    i = int(np.clip(s * SR, 0, N - 1))
    out[i:i + len(x)] += x[:N - i]


def scene():
    """Water, netting and hull over the faint wash of the sea."""
    # water and wet wood are soft: single impacts carry little top treble
    soft = signal.butter(2, 8500, fs=SR, output="sos")
    water = runoff() + trickle() + sloshes() + signal.sosfilt(soft, drips())
    impacts = signal.sosfilt(soft, drops() + taps())
    far = boat_echo(water, near_db=-6.0, tail_db=-7.0)
    near = boat_echo(impacts, near_db=-11, tail_db=-14)
    hull = signal.sosfilt(soft, knocks())
    return (far + near + netting() + deck_patter() + hull + sea())[None]


def record(dry):
    """The recorder suppresses faint steady noise and cuts the top."""
    top_cut = signal.ellip(10, .2, 70, TOP_HZ, fs=SR, output="sos")
    return signal.sosfilt(top_cut, suppress(dry))


dry = scene()
out = record(dry)
transcribe(out)
```